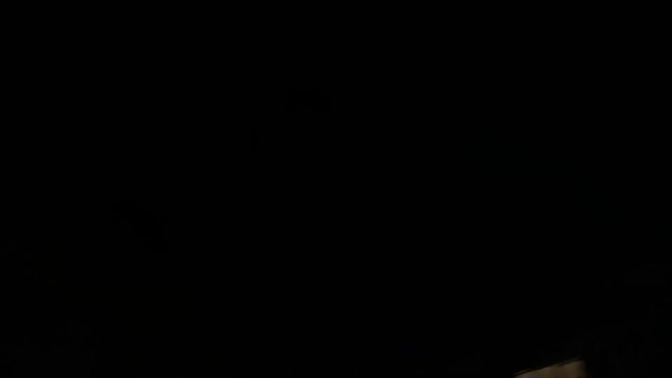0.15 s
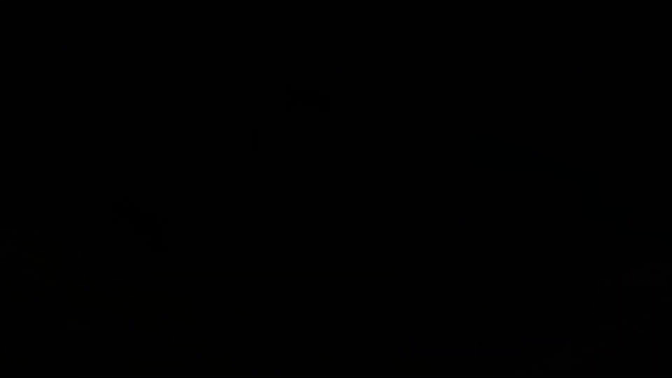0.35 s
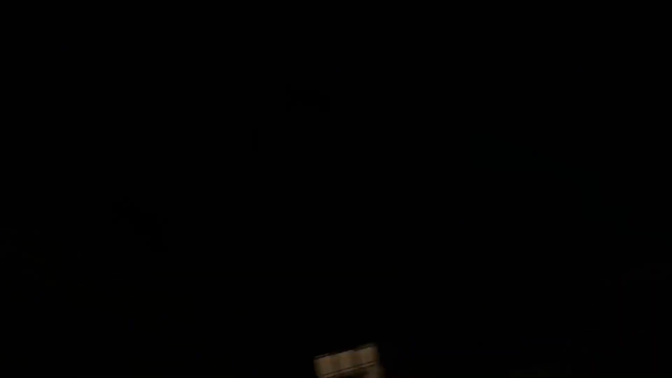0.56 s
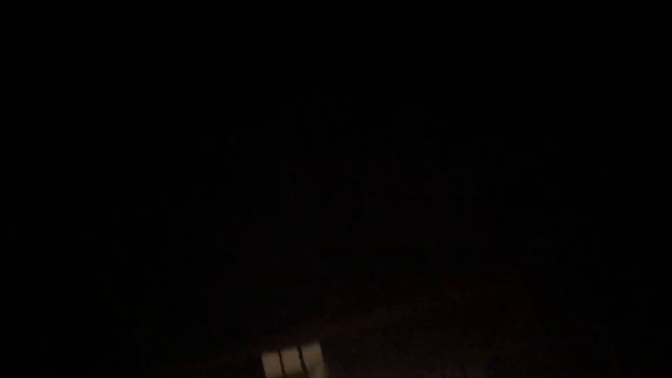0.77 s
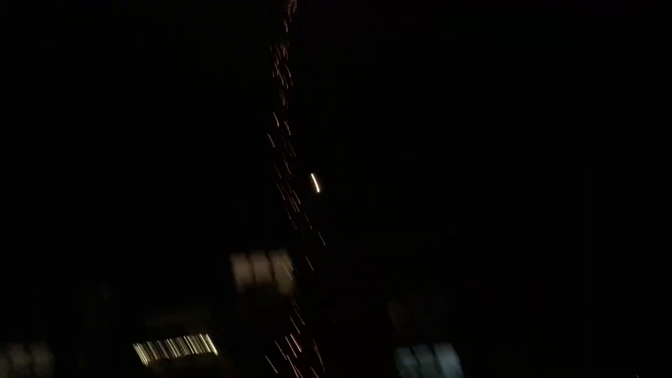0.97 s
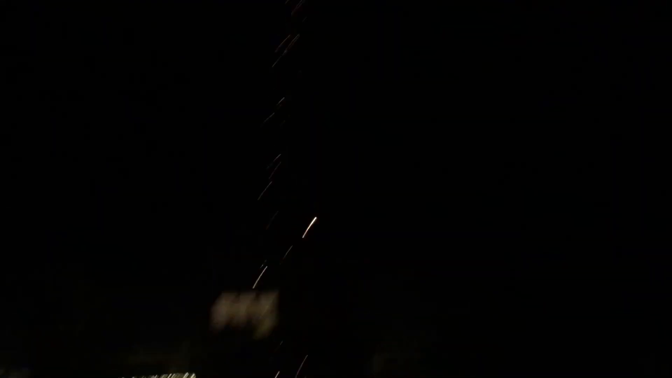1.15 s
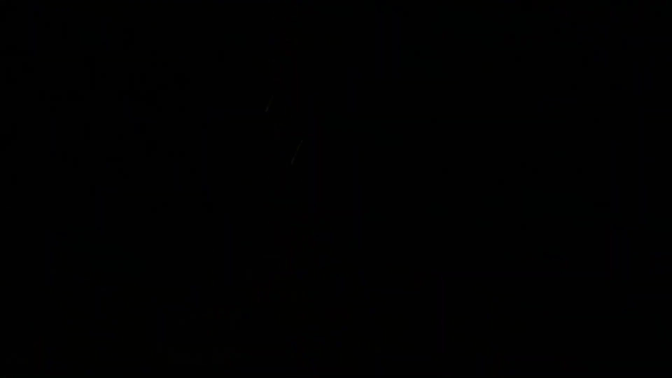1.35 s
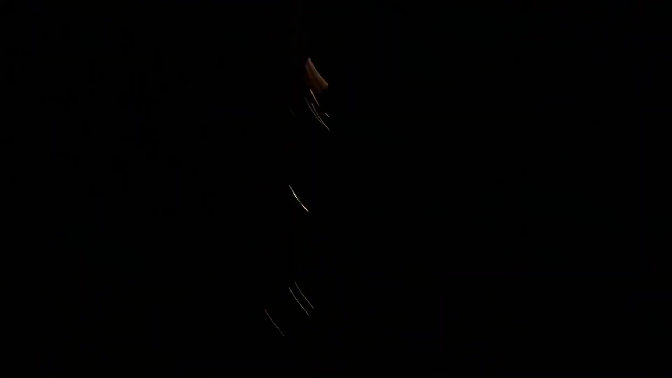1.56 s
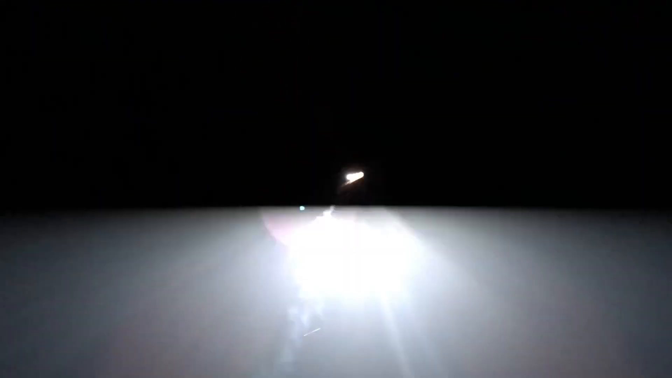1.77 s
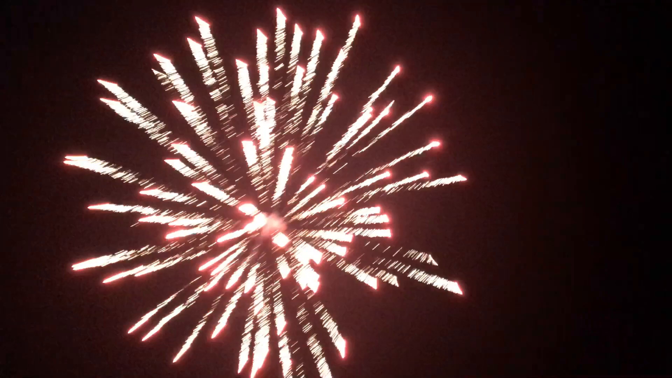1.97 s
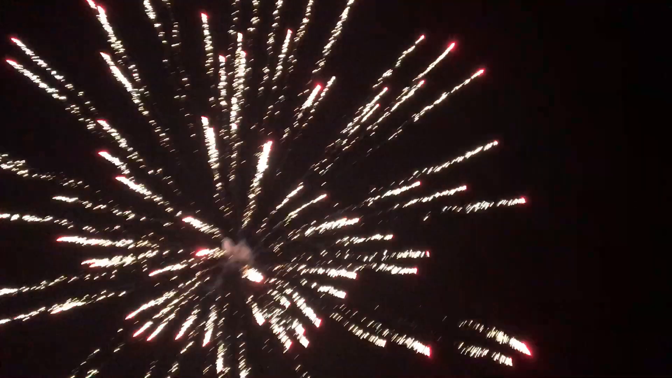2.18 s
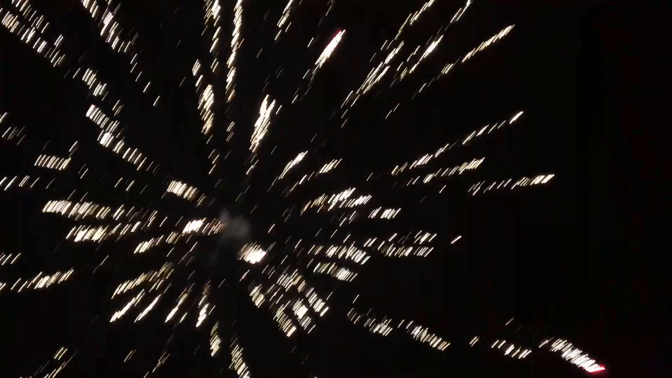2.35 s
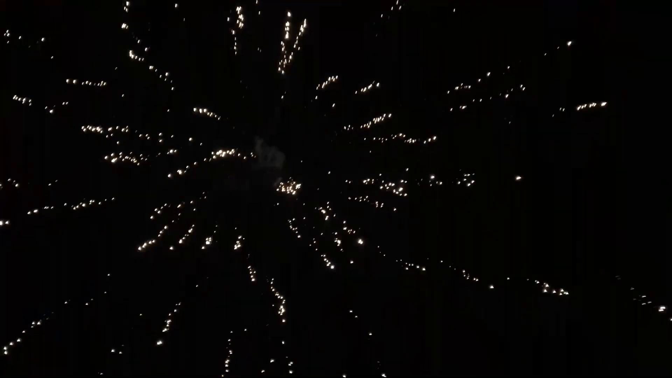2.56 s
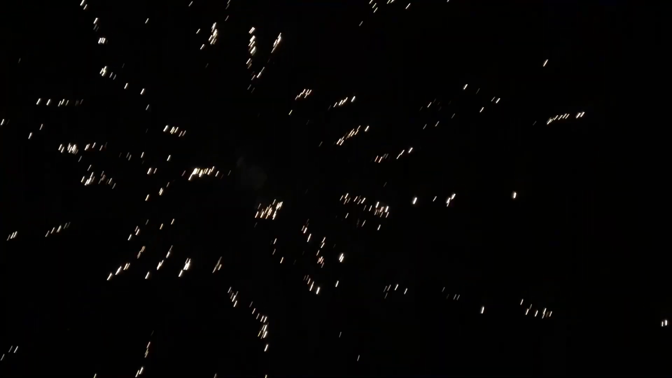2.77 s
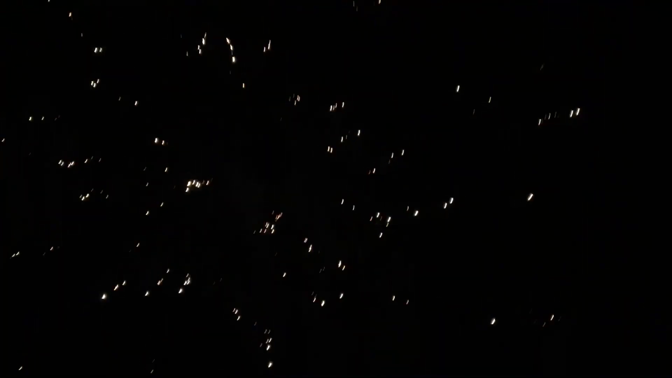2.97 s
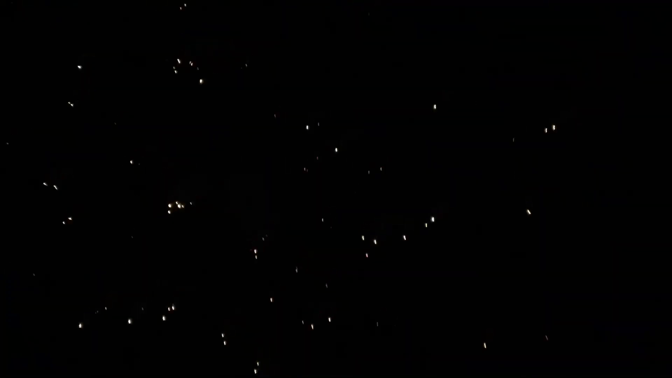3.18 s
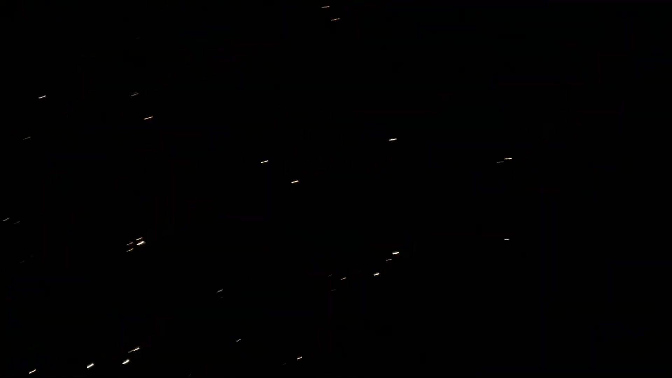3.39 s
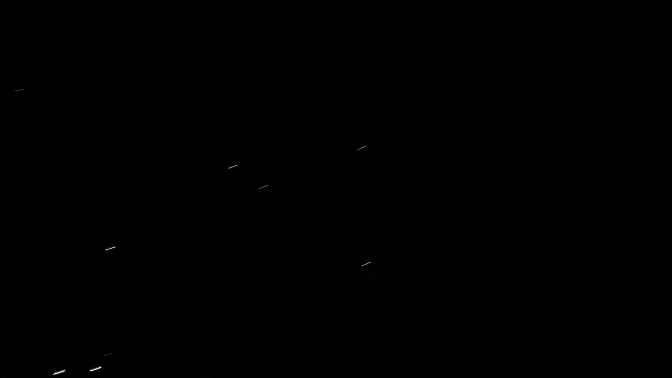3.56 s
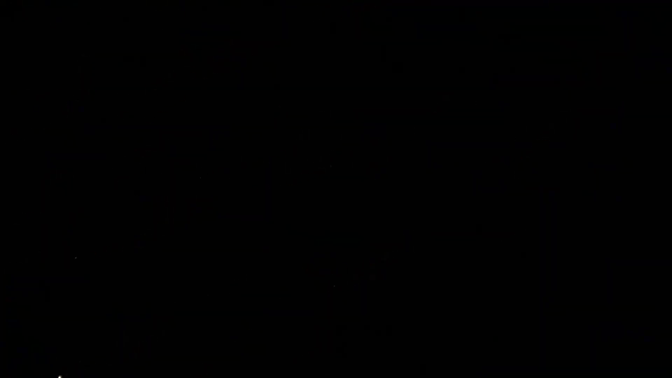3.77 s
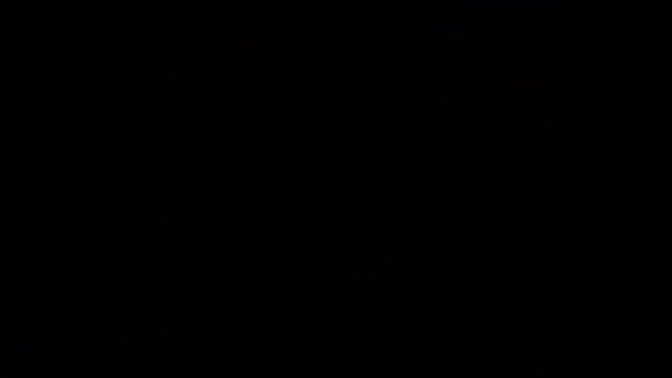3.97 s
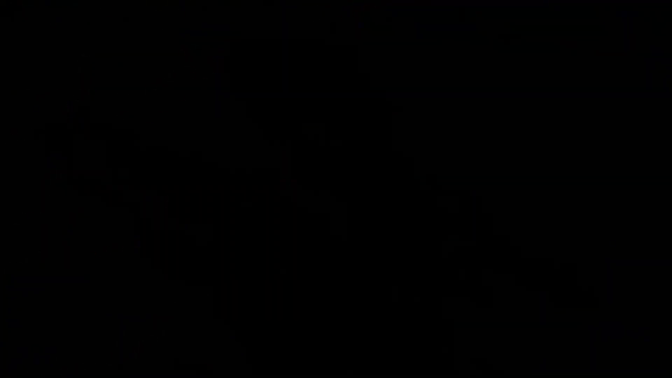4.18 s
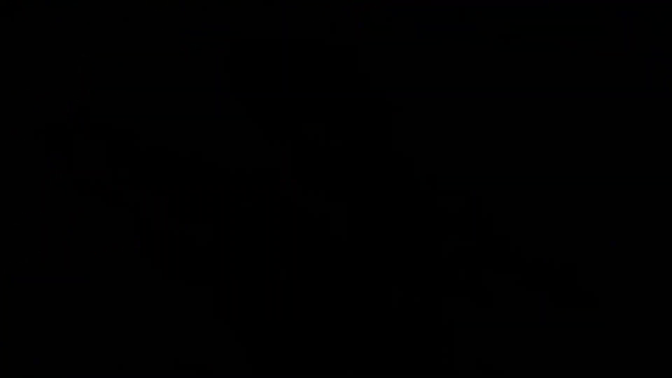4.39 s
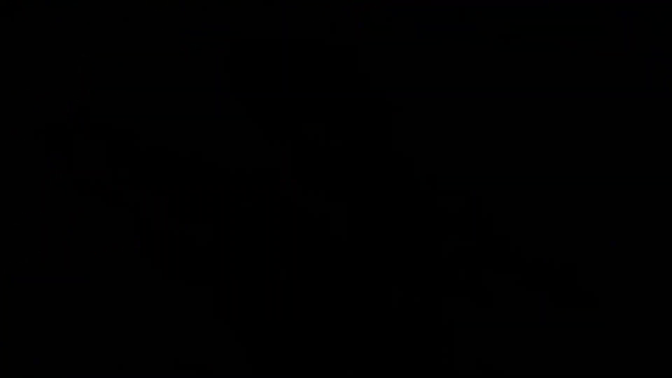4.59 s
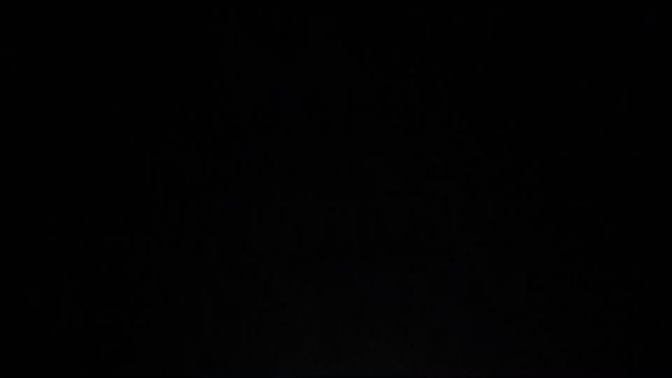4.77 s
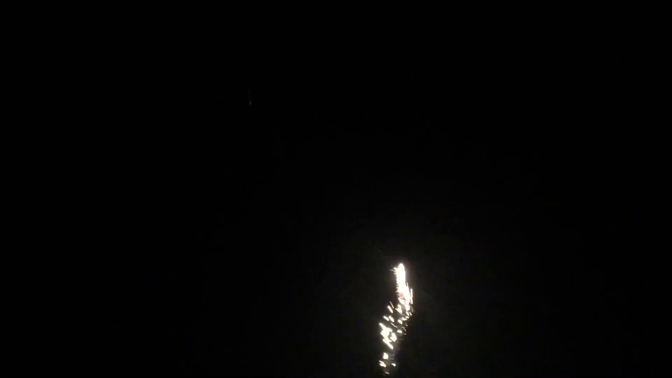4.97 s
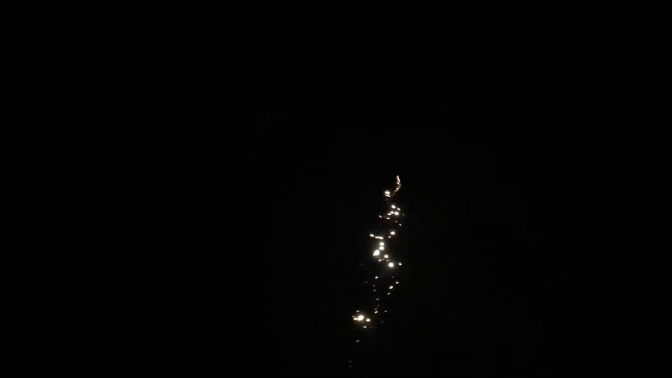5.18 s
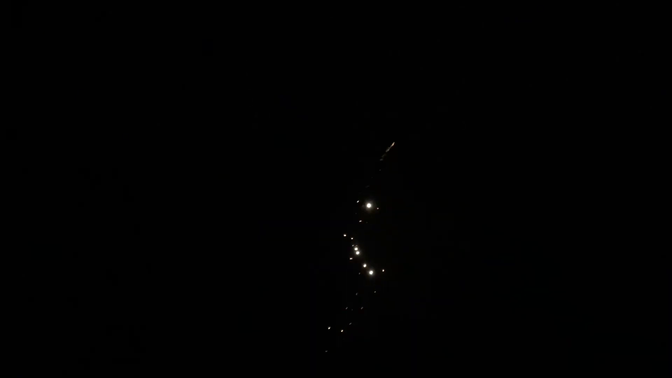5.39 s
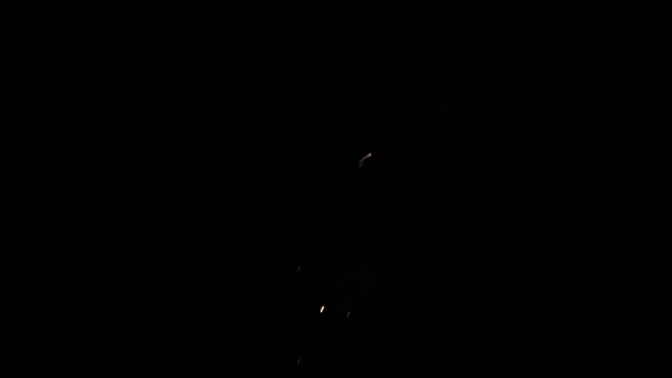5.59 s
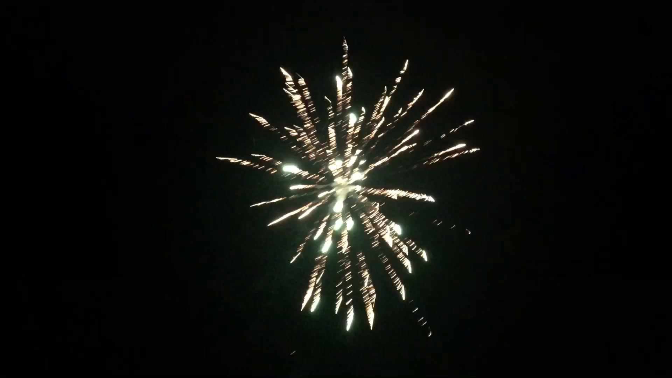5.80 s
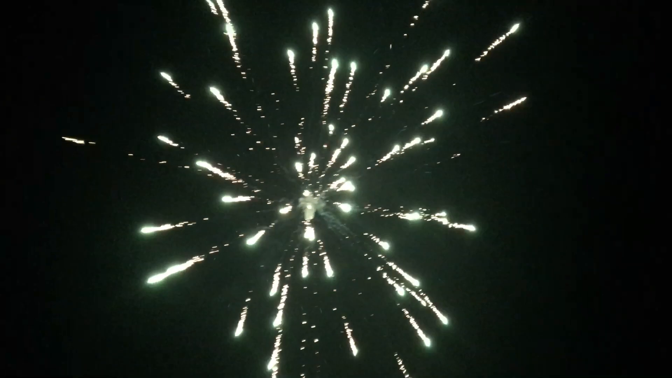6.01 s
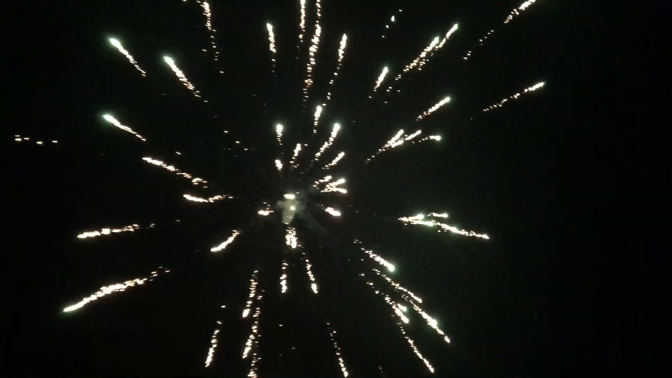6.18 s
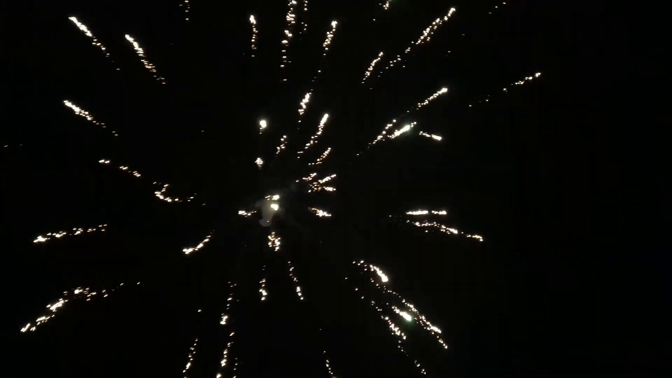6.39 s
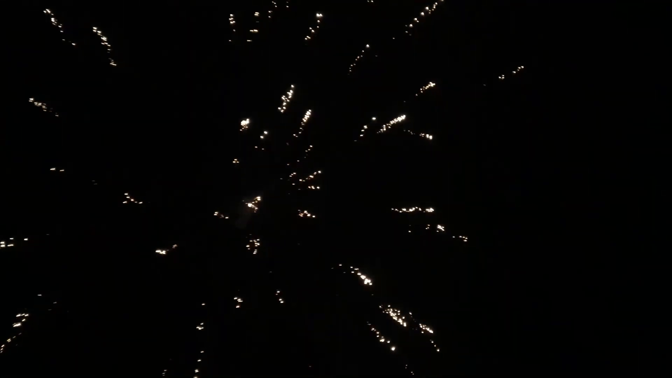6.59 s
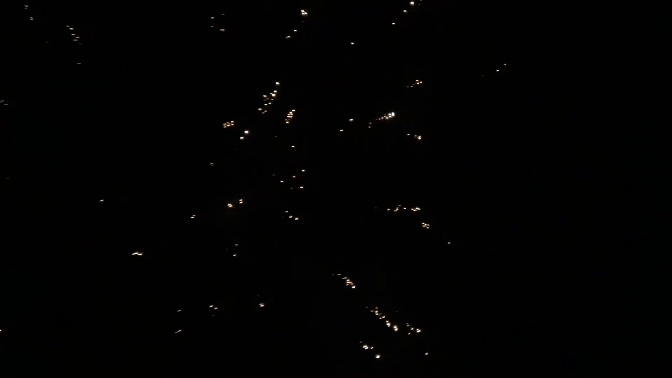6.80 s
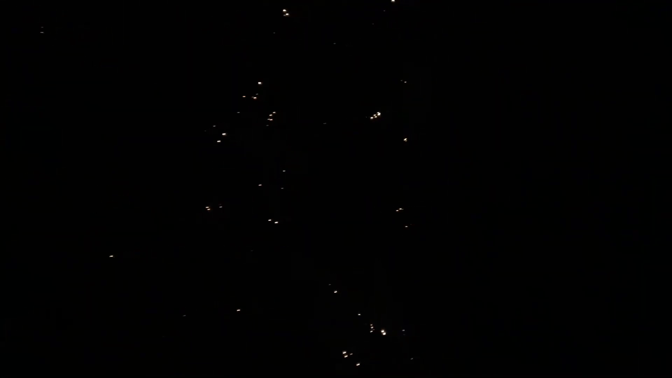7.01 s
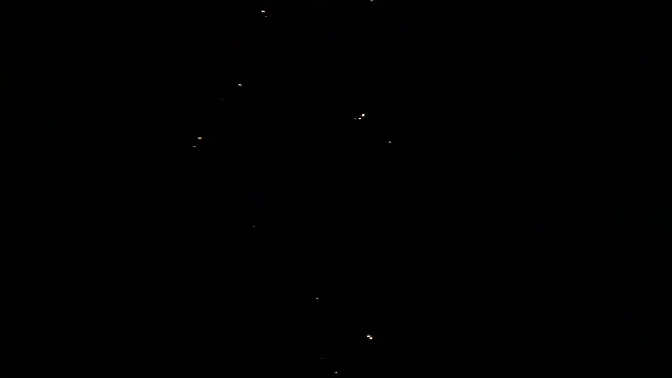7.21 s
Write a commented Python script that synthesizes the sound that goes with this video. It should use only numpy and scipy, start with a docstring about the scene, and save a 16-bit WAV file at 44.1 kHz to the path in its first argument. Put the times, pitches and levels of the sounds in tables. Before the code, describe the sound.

Outdoors at night between houses, a fuse hisses, powder snaps and a launch bangs, slapping off nearby walls. Wind thumps the microphone while the shell climbs, then a very loud burst overloads it and rolls away, duller and duller. A tiny metallic clink sounds in the fading rumble. A second launch and burst follow, with a few spark snaps between, over faint distant town hum.

```python
"""Two firework shells, fired one after the other at night between houses, heard from close by.
Each lift charge bangs as a shock wave and slaps off the walls; each burst overloads the input and rolls on, ever duller.
Coloured random clicks make the fuse hiss and the spark trail; a few single sparks snap, and powder cracks in the tube.
Filtered noise makes the gusts that buffet the microphone and the distant town; decaying sines make a small clink."""
import sys
import numpy as np
from scipy import signal
from scipy.io import wavfile

SR = 44100
rng = np.random.default_rng(int(sys.argv[2]) if len(sys.argv) > 2 else 0)


def output_pcm(signal):
    """Save a mono or channel-first signal as 16-bit PCM at the path in sys.argv[1].

    Samples are clipped to [-1, 1] before scaling.
    """
    pcm = np.clip(np.atleast_2d(signal).T, -1, 1) * 32767
    wavfile.write(sys.argv[1], SR, np.round(pcm).astype(np.int16))


N = 319725  # length in samples
TIME = np.arange(N) / SR  # seconds


def from_db(db):
    """Decibels to gain."""
    return 10 ** (np.asarray(db) / 20)


def butter(x, hz, kind, order=2):
    """Causal Butterworth filter."""
    safe_hz = np.clip(hz, 10, .45 * SR)
    sections = signal.butter(order, safe_hz, kind, fs=SR, output="sos")
    return signal.sosfilt(sections, x + 1e-18)


def add(track, s, sound):
    """Mix a sound into a track at a given time in seconds."""
    at = int(round(s * SR))
    track[at:at + len(sound)] += sound[:N - at]


def drift(size, per_s):
    """Slow random wander with a spread of about 1, joining per_s random points each second."""
    return np.interp(TIME[:size] * per_s, np.arange(2000), rng.standard_normal(2000))


def swell(s, rise_s, hold_s, db, fall_db_per_s):
    """Gain that rises to its level at time s, holds, then falls steadily in dB."""
    early = np.maximum(s - TIME, 0)
    late = np.maximum(TIME - s - hold_s, 0)
    rise = np.exp(-np.minimum(early / rise_s, 20) ** 2)
    return rise * from_db(db - np.minimum(fall_db_per_s * late, 200))


def grains(size, per_s, spread_db):
    """Random clicks of uneven strength and sign; rms 1."""
    arrives = rng.random(size) < per_s / SR
    sign = rng.choice([-1, 1], size)
    strength = from_db(spread_db * np.clip(rng.standard_normal(size), -2, 2))
    clicks = arrives * sign * strength
    return clicks / np.sqrt(np.mean(clicks ** 2) + 1e-20)


def coloured(source, spectrum, band_gain=lambda hz: 1):
    """Colour a source through half-octave bands; white at rms 1 stays near rms 1 before band_gain."""
    edges = 22 * 2 ** np.arange(0, 9.6, .5)  # Hz
    points, out, power = np.array(spectrum), 0, 0
    for k, (low, high) in enumerate(zip(edges, edges[1:])):
        inside = np.log(np.geomspace(low, high, 10))
        gain = from_db(np.interp(inside, np.log(points[:, 0]), points[:, 1])).mean()
        band = butter(source, [low, high], "band")
        # alternate signs so that neighbouring bands join without notches
        out = out + (-1) ** k * gain * band_gain(np.sqrt(low * high)) * band
        power += gain ** 2 * (high - low) / (SR / 2)
    return out / np.sqrt(2 * power)


def shock(push_s):
    """Blast wave: a pressure jump that falls through zero into a long, shallow suction."""
    age = TIME[:SR // 6] / push_s
    return (1 - age) * np.exp(-age)


def microphone(pressure, bass_cut_hz, smear_hz):
    """The bass cut and its phase lag stretch a shock into a quick downward swoop."""
    out = butter(pressure, bass_cut_hz, "high", order=3)
    r = np.exp(-2 * np.pi * smear_hz / SR)
    for stage in range(2):
        out = signal.lfilter([-r, 1], [1, -r], out)  # all-pass: shifts phase only
    return -out


def blasts(shots, air_cut_hz, ground_cut_hz, stretch):
    """Each shock arrives directly and once more, softened and drawn out, off the ground."""
    out = np.zeros(N)
    for s, db, push_s, bounce_s, bounce_db, *_ in shots:
        direct = butter(shock(push_s), air_cut_hz, "low", order=1)
        bounce = butter(shock(stretch * push_s), ground_cut_hz, "low")
        add(out, s, from_db(db) * direct)
        add(out, s + bounce_s, from_db(db + bounce_db) * bounce)
    return out


def scatter(shots, spectrum, rise_s, early_db, t60, bass_t60, treble_t60):
    """Dense small reflections start at early_db, reach full level around rise_s, then die away by band."""
    out, age = np.zeros(N), TIME[:SR // 2]
    onset = 1 - (1 - from_db(early_db)) * np.exp(-(age / rise_s) ** 6)

    def decay(hz):
        band_t60 = np.interp(hz, [70, 250, 2500, 12000], [bass_t60, t60, t60, treble_t60])
        return from_db(-60 * np.maximum(age - rise_s, 0) / band_t60)

    for s, *_, scatter_db, bright_hz in shots:
        reflections = butter(grains(len(age), 8000, 2.5), bright_hz, "low", order=1)
        add(out, s, from_db(scatter_db) * onset * coloured(reflections, spectrum, decay))
    return out


def cracks(rows, push_s, ragged_db, ragged_s):
    """Short pressure kicks, each frayed into a little cluster and confined to its own band."""
    out, age = np.zeros(N), TIME[:SR // 30]
    for s, db, low_hz, high_hz in rows:
        cluster = from_db(ragged_db) * rng.standard_normal(len(age)) * np.exp(-age / ragged_s)
        cluster[0] = 1
        frayed = signal.fftconvolve(shock(push_s), cluster)
        crack = butter(butter(frayed, high_hz, "low"), low_hz, "high")
        add(out, s, from_db(db) * crack / np.abs(crack).max())
    return out


def slaps(shots, walls, paths=(1, 1)):
    """Crack rows for every shot off the same walls; paths scales the delays of each shot."""
    rows = []
    for (s, *_, walls_db, _, _, _), path in zip(shots, paths):
        for delay_s, db, low_hz, high_hz in walls:
            rows.append((s + path * delay_s, walls_db + db, low_hz, high_hz))
    return rows


def roll(shots, returns, spectrum, air_db_per_s, air_slope, per_s, lumpy_db):
    """Echoes return in clumped swells; later ones have come further and lost more treble."""
    out, age = np.zeros(N), TIME[:3 * SR]

    def air(hz):
        loss_per_s = air_db_per_s * (hz / 4000) ** air_slope  # air_db_per_s holds at 4 kHz
        return from_db(-np.minimum(loss_per_s * np.maximum(age - .3, 0), 100))

    envelope = np.sqrt(sum(swell(*row)[:len(age)] ** 2 for row in returns))
    for s, *_, roll_db, _, _ in shots:
        clumps = grains(len(age), per_s, 2.5) * from_db(lumpy_db * drift(len(age), 50))
        add(out, s, from_db(roll_db) * envelope * coloured(clumps, spectrum, air))
    return out


# Colour of the far-off wash. Each row: frequency in Hz, relative level in dB per Hz.
TOWN_COLOUR = [(40, -11), (100, -3), (200, -7), (350, -8.5), (650, -11), (1000, -9), (2000, -22.5),
               (3500, -30.5), (6000, -39), (15000, -56)]
# Ride of the low drone. Each row: time in seconds, level in dB.
DRONE_LEVEL = [(0, -48), (.7, -39), (2.1, -41.5), (3.5, -50), (4.1, -52.5), (4.5, -44), (5.7, -43.5),
               (6.1, -42.5), (7.25, -51)]
# Colour of the drone. Each row: frequency in Hz, relative level in dB per Hz.
DRONE_COLOUR = [(20, -28.5), (35, -46.5), (54, 11), (75, -4), (130, -25.5), (400, -57.5)]


def town():
    """Far-off traffic: steady filtered noise as a soft wash, over a low noise drone that rises and falls."""
    wash = from_db(-52) * coloured(rng.standard_normal(N), TOWN_COLOUR)
    drone_gain = from_db(np.interp(TIME, *np.transpose(DRONE_LEVEL)))
    return wash + drone_gain * coloured(rng.standard_normal(N), DRONE_COLOUR)


# Wind on the microphone. Each row: time of full force in seconds, hold in seconds, level in dB before flutter.
GUSTS = [(0.268, .21, -38), (.52, 0.2, -52.5), (.95, 0.23, -31.5), (1.282, 0.063, -26),
         (1.374, 0.19, -29.5), (1.48, 0.072, -18), (1.592, 0.095, -21), (1.74, 0.058, -37.5)]
# Colour of its rumble. Each row: frequency in Hz, relative level in dB per Hz.
GUST_COLOUR = [(20, -10), (50, -0.5), (100, 4), (180, -6), (300, -8), (500, -24), (750, -35), (2000, -66)]
# Eddies thumping the microphone. Each row: start in seconds, peak in dB, lowest and highest frequency in Hz.
BUFFETS = [(1.283, -14, 120, 280), (1.317, -17, 100, 260), (1.497, -14, 70, 380), (1.608, -21, 150, 270),
           (1.641, -16, 100, 300)]


def wind(reach, flutter_db):
    """Eddies buffet the microphone: the stronger the gust, the higher they reach; single eddies thump."""
    rise_s, fall_db_per_s = 0.033, 241
    gusts = [swell(s, rise_s, hold_s, db, fall_db_per_s) for s, hold_s, db in GUSTS]
    force = np.sqrt(sum(gust ** 2 for gust in gusts))
    force = force * from_db(flutter_db * drift(N, 45))

    def brighten(hz):
        octaves_up = np.clip(np.log2(hz / 150), 0, 2)
        return (force / force.max()) ** (reach * octaves_up)

    rumble = force * coloured(rng.standard_normal(N), GUST_COLOUR, brighten)
    return rumble + cracks(BUFFETS, push_s=.002, ragged_db=-20, ragged_s=.004)


# Bounces of a small piece of metal. Each row: start in seconds, relative level in dB.
CLINKS = [(3.2305, -30.5), (3.3035, -41.5), (3.363, -58), (3.412, -58)]
# Its modes. Each row: frequency in Hz, relative level in dB, time to fall 60 dB in seconds.
METAL_MODES = [(5717, -39, .5), (6137, -37, .6), (6578, -38, .5), (7488, -26, .55), (8414, -33, .5),
               (8872, -33, .45), (10050, -37, .4), (7400, -2, .012), (8200, -2, .012), (11450, -13, .012)]


def clink(clink_db, scatter_db, scatter_t60):
    """A bright tick and a faint ring of decaying sines at every bounce, roughened by scatter off the walls."""
    out, age = np.zeros(N), TIME[:SR]
    for s, db in CLINKS:
        for hz, mode_db, t60 in METAL_MODES:
            strike_db = clink_db + db + mode_db + rng.normal(0, 1.9)  # no two bounces strike alike
            add(out, s, from_db(strike_db - 60 * age / t60) * np.sin(2 * np.pi * hz * age))
        wash = butter(rng.standard_normal(SR), [6500, 9500], "band")
        add(out, s, wash * from_db(db + scatter_db - 60 * age / scatter_t60))
    return out


# Fuse in the tube. Each row: time of full level in seconds, hold in seconds, hiss in dB, spray in dB.
FUSE_BURNS = [(0, 0.32, -52.5, -61.5), (0.385, 0.081, -43, -68), (0.474, 0.26, -47, -68),
              (0.799, 0.056, -40.5, -42.5), (4.61, 0.31, -66, -71)]
# Colour of the fuse hiss. Each row: frequency in Hz, relative level in dB per Hz.
FUSE_COLOUR = [(300, -29.5), (700, 3.5), (1400, 11.5), (2200, 5), (3800, -2), (5000, -25.5), (8000, -25),
               (15000, -41.5)]
# Colour of the spark spray, fuse and shell alike. Each row: frequency in Hz, relative level in dB per Hz.
SPRAY_COLOUR = [(1000, -8.5), (3000, 11.5), (6000, 11), (9000, 5), (10500, -7), (12500, 0.5),
                (16000, -10.5)]
# Single sparks snapping. Each row: start in seconds, peak in dB.
SNAPS = [(2.8723, -35), (5.1089, -21), (5.2, -31), (5.5875, -24), (5.677, -26)]


def sparks(snap_s):
    """Burning fuse and climbing shell hiss with dense tiny pops; a few sparks snap as short noise bursts."""
    fuse_rise_s, fall_db_per_s = 0.024, 158
    trail_delay_s, trail_rise_s = .09, 0.055
    hiss = spray = 0
    for s, hold_s, hiss_db, spray_db in FUSE_BURNS:
        burn = swell(s, fuse_rise_s, hold_s, 0, fall_db_per_s)
        hiss = np.hypot(hiss, from_db(hiss_db) * burn)
        spray = np.hypot(spray, from_db(spray_db) * burn)
    for s, *_ in LAUNCHES:
        trail = swell(s + trail_delay_s, trail_rise_s, 0, -42, 42.5)
        sputter = swell(s, trail_rise_s, 1.05, -62, fall_db_per_s)  # faint, held through the climb
        spray = spray + np.hypot(trail, sputter)
    out = hiss * coloured(grains(N, 12000, 2.5), FUSE_COLOUR)
    out += spray * coloured(grains(N, 7000, 4.), SPRAY_COLOUR)
    age = TIME[:SR // 100]
    for s, db in SNAPS:
        burst = rng.standard_normal(len(age)) * np.exp(-age / snap_s)
        snap = butter(butter(burst, 1200, "high"), 5500, "low", order=1)
        add(out, s, from_db(db) * snap / np.abs(snap).max())
    return out


# Powder catching. Each row: start in seconds, peak in dB, lowest and highest frequency in Hz.
POPS = [(.7852, -28, 800, 6000), (.8368, -20, 800, 2500), (4.7765, -13, 900, 1900),
        (4.7795, -18, 1500, 9000)]


def ignition():
    """Powder catches in the tube just before each lift: very short, frayed pressure kicks."""
    return cracks(POPS, push_s=0.00017, ragged_db=-18.0, ragged_s=0.002)


# Lift charges. Each row: start in seconds, shock in dB before the filters, push in seconds,
# ground bounce delay in seconds, bounce in dB against the shock, walls in dB, roll in dB, scatter in dB,
# scatter brightness in Hz.
LAUNCHES = [(0.8575, -1, 0.0016, .0095, 7, 0.5, -0.5, -2.5, 15380),
            (4.7820, 3, 0.0079, .0075, -10.5, 2, .5, -6.5, 7240)]
# Scatter from ground and garden nearby. Each row: frequency in Hz, relative level in dB per Hz.
LAUNCH_NEAR = [(30, 5.5), (55, 16.5), (120, -3), (260, 2), (500, -18), (900, -4.5), (1600, -5.5),
               (3500, -15), (6000, -19), (10000, -25), (16000, -24.5)]
# Walls slapping back. Each row: delay in seconds, relative peak in dB, lowest and highest frequency in Hz.
LAUNCH_WALLS = [(.0302, -11, 1200, 9000), (.0652, -10, 800, 3000), (.0675, -19, 80, 210),
                (.0928, -15, 900, 1900), (.1019, -9, 1000, 2600), (.1064, -13, 1100, 6000),
                (.1165, -18, 1000, 4000), (.119, -22, 80, 170)]
# The second launch comes back off the walls a little sooner. One share of the wall delays for each shot.
WALL_PATHS = (1, .955)
# Rows of houses further off. Each row: delay in seconds, rise in seconds, hold in seconds,
# relative level in dB, fall in dB per second.
LAUNCH_ECHOES = [(0.103, 0.03, .04, -30, 80), (0.239, 0.055, 0.024, -28, 50),
                 (0.426, 0.015, 0.025, -36.5, 54.5), (0.567, 0.013, 0.0078, -35, 60),
                 (.73, .03, .02, -42.5, 53.5), (0.87, 0.033, .01, -45, 10)]
# Colour of the echoes from the town. Each row: frequency in Hz, relative level in dB per Hz.
LAUNCH_FAR = [(40, -6.5), (100, 3), (200, -5), (400, -9), (700, -13.5), (1150, -2.5), (1700, -10),
              (2500, -13.5), (4000, -20.5), (7000, -37), (15000, -61)]


def launches():
    """The lift charges: a shock-wave thump, nearby scatter, wall slaps and a short roll."""
    shocks = blasts(LAUNCHES, air_cut_hz=8100, ground_cut_hz=5800, stretch=3.5)
    out = microphone(shocks, bass_cut_hz=45, smear_hz=310)
    out += scatter(LAUNCHES, LAUNCH_NEAR, rise_s=0.0016, early_db=2.5,
                   t60=0.14, bass_t60=0.071, treble_t60=0.2)
    wall_rows = slaps(LAUNCHES, LAUNCH_WALLS, WALL_PATHS)
    out += cracks(wall_rows, push_s=.0005, ragged_db=-17, ragged_s=.002)
    return out + roll(LAUNCHES, LAUNCH_ECHOES, LAUNCH_FAR,
                      air_db_per_s=7., air_slope=4.6, per_s=2500, lumpy_db=2.2)


# Shell bursts. Each row: start in seconds, shock in dB before the filters, push in seconds,
# ground bounce delay in seconds, bounce in dB against the shock, walls in dB, roll in dB, scatter in dB,
# scatter brightness in Hz.
BURSTS = [(1.9576, 16.5, .0016, .0108, -10, 2.5, .5, -11, 12000),
          (5.8394, 16.5, .0015, .0106, -12, -2, -.5, -10, 12000)]
# Scatter from ground and garden nearby. Each row: frequency in Hz, relative level in dB per Hz.
BURST_NEAR = [(30, 3), (55, 3.5), (120, -2), (300, 0), (700, -4), (1600, -10), (3000, -16.5), (6000, -18.5),
              (10000, -23.5), (16000, -30.5)]
# Roofs and house fronts slapping back. Each row: delay in seconds, relative peak in dB,
# lowest and highest frequency in Hz.
BURST_WALLS = [(.017, -3, 150, 2100), (.0607, -6, 200, 1800), (.0626, -10, 300, 7000),
               (.068, -4, 200, 1600), (.070, -7, 300, 7000), (.087, -12, 150, 800), (.0944, -11, 200, 1200),
               (.1205, -13, 200, 1400), (.84, -22, 200, 500)]
# From overhead a burst reaches the whole town. Each row: delay in seconds, rise in seconds, hold in seconds,
# relative level in dB, fall in dB per second.
BURST_ECHOES = [(0.124, 0.014, 0.005, -17.5, 270), (0.233, 0.037, 0.015, -24, 30),
                (.63, 0.15, 0.2, -31.5, 22.6), (.85, .08, .27, -32, 21), (1.898, 0.57, 0.08, -49, 3.2)]
# Colour of the echoes from the town. Each row: frequency in Hz, relative level in dB per Hz.
BURST_FAR = [(30, -73), (60, -10), (130, -7.5), (270, -1), (600, -2.5), (900, -11), (1500, -10.5),
             (2500, -20), (4000, -24), (7000, -37), (15000, -60)]


def bursts():
    """The shells: a hard shock from above, the crash off the ground, roof slaps and a long roll."""
    shocks = blasts(BURSTS, air_cut_hz=2600, ground_cut_hz=2200, stretch=3.5)
    out = microphone(shocks, bass_cut_hz=29, smear_hz=550)
    out += scatter(BURSTS, BURST_NEAR, rise_s=.018, early_db=-9,
                   t60=0.54, bass_t60=0.16, treble_t60=0.29)
    out += cracks(slaps(BURSTS, BURST_WALLS), push_s=.0005, ragged_db=-17, ragged_s=.002)
    return out + roll(BURSTS, BURST_ECHOES, BURST_FAR,
                      air_db_per_s=9.5, air_slope=2.43, per_s=2500, lumpy_db=0.5)


def scene():
    """Both shots with their echoes, over the night air; one channel."""
    background = town() + wind(reach=0.44, flutter_db=2.0)
    small = clink(clink_db=1.0, scatter_db=-23.5, scatter_t60=0.82) + sparks(snap_s=0.00042)
    shots = ignition() + launches() + bursts()
    return (background + small + shots)[None]


def record(dry):
    """The shocks overload the input, which rounds off softly; a steep filter then cuts the top."""
    overloaded = .86 * np.tanh(dry / .86)
    top_cut = signal.ellip(10, .1, 80, 15900, fs=SR, output="sos")  # low-pass at 15900 Hz
    return signal.sosfilt(top_cut, overloaded)


dry = scene()
out = record(dry)
output_pcm(out)
```